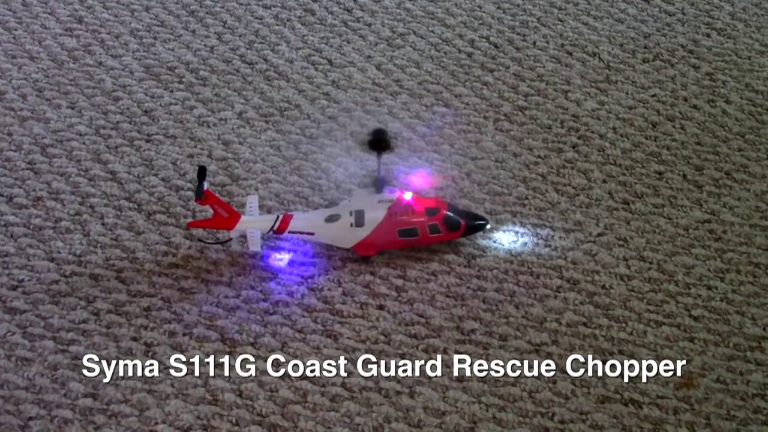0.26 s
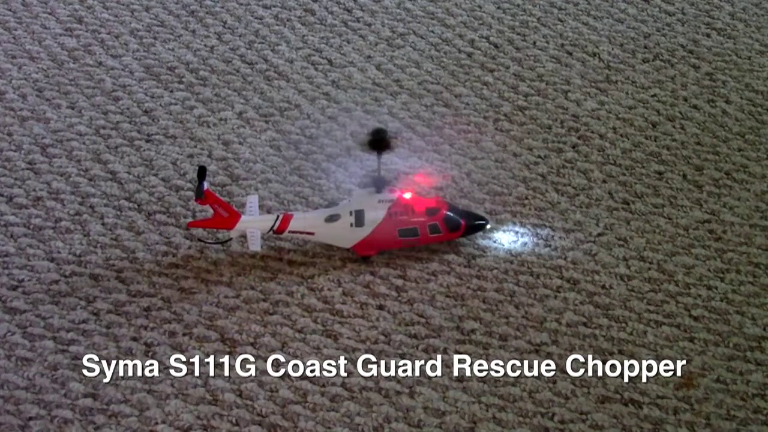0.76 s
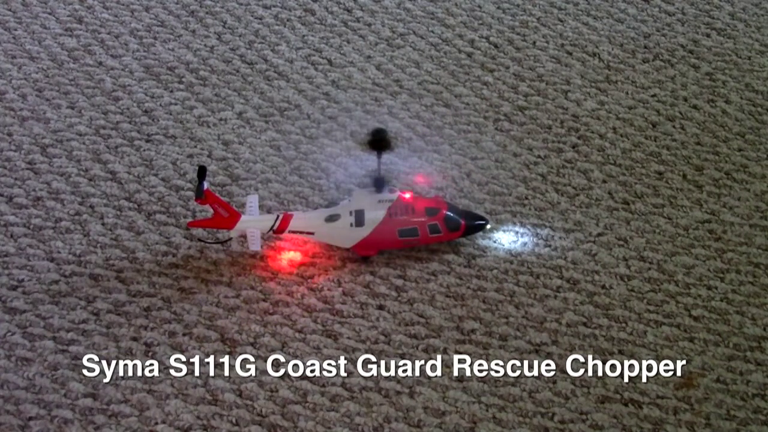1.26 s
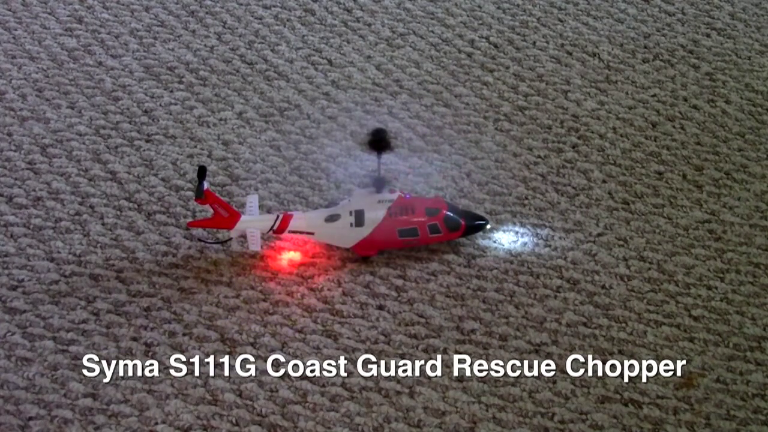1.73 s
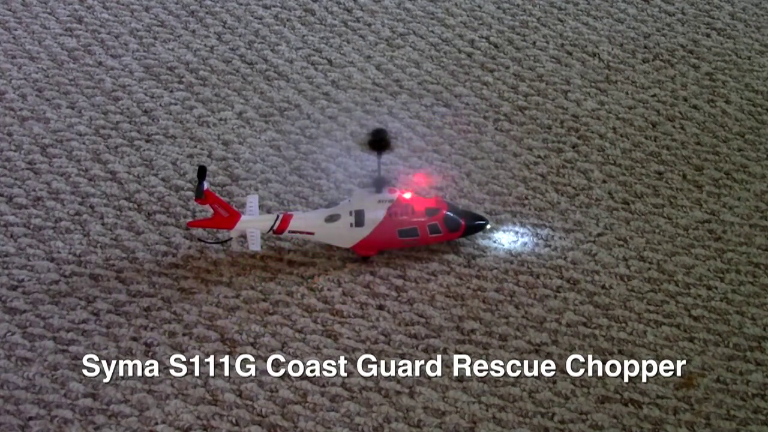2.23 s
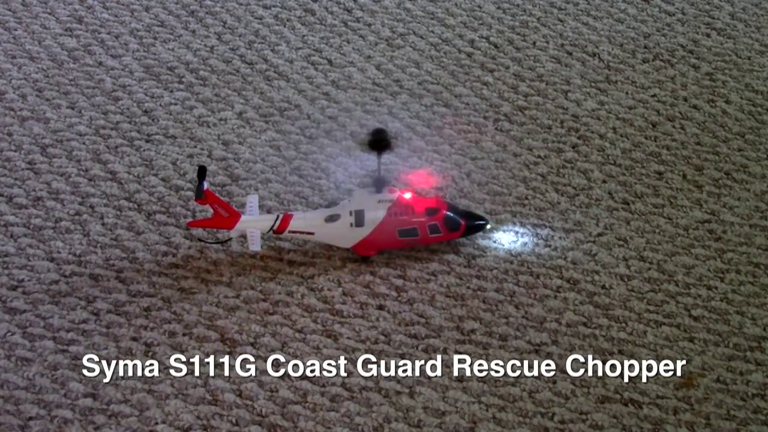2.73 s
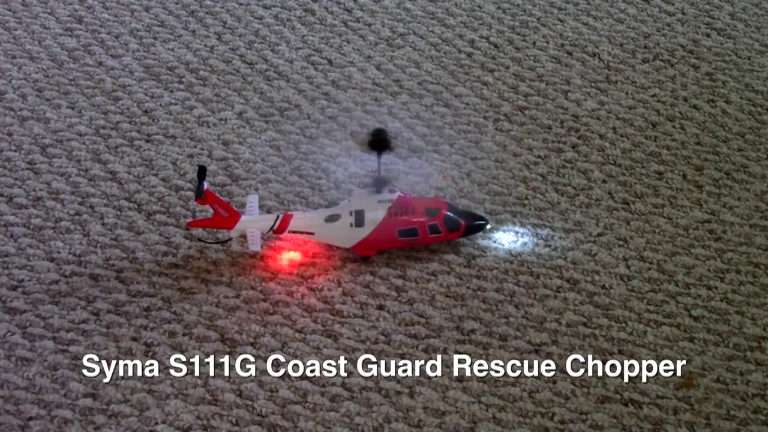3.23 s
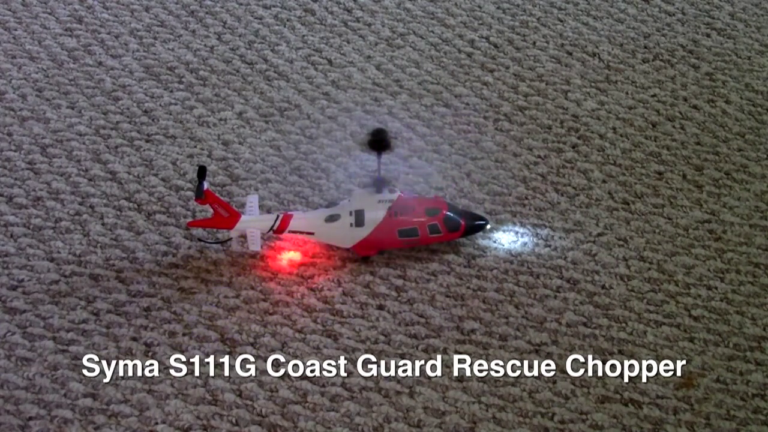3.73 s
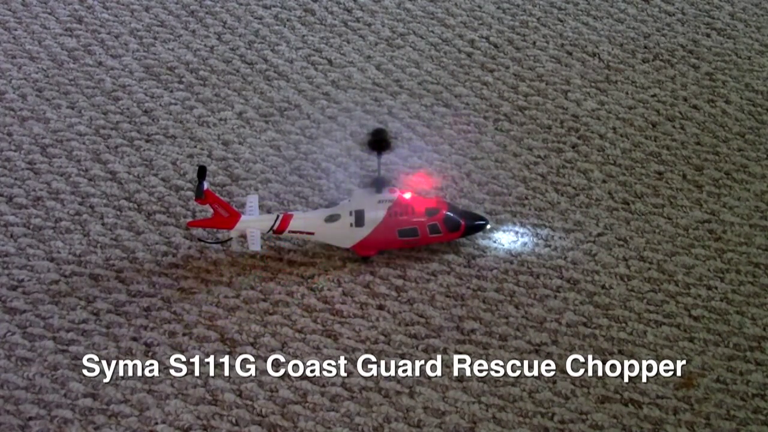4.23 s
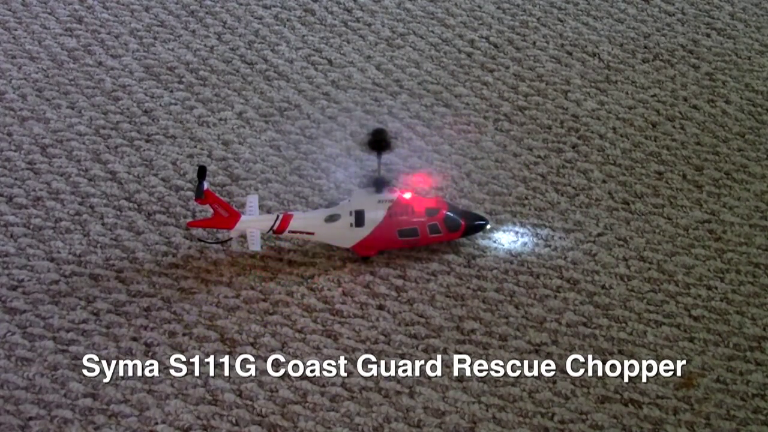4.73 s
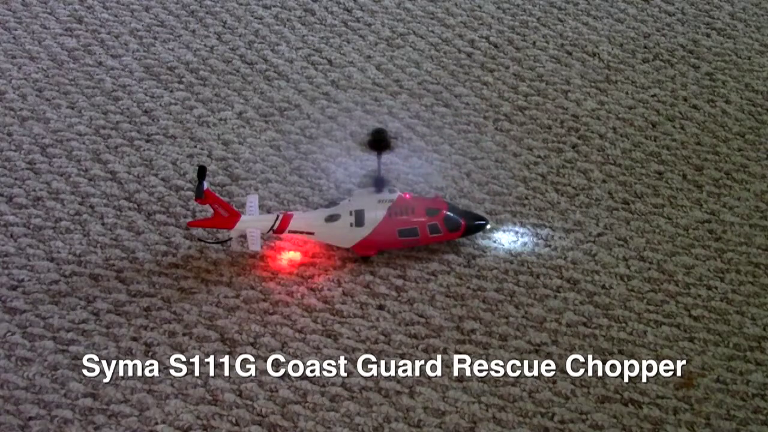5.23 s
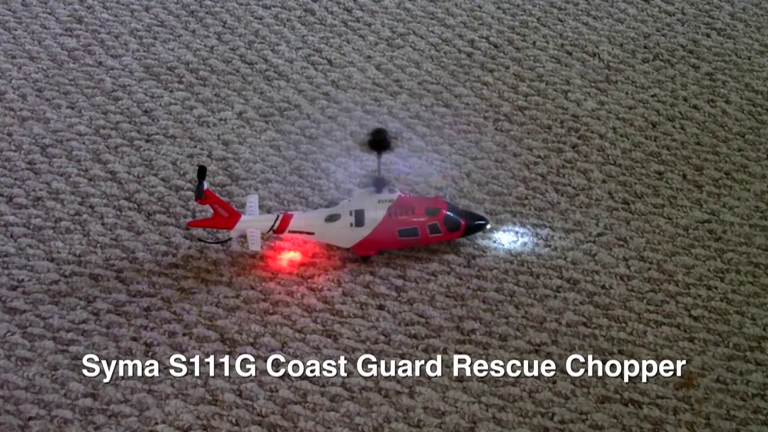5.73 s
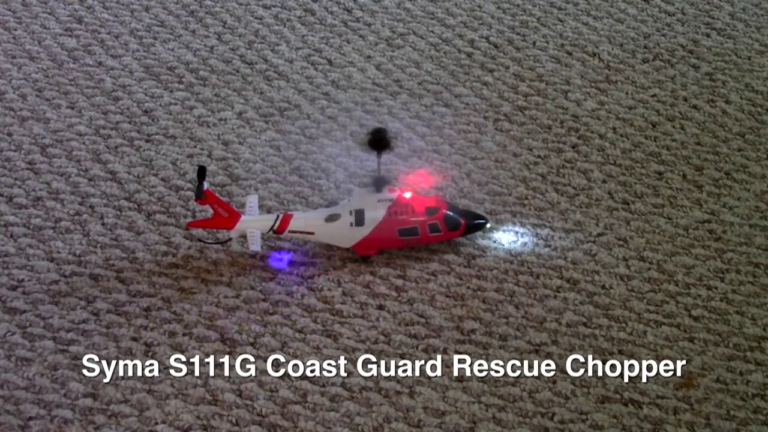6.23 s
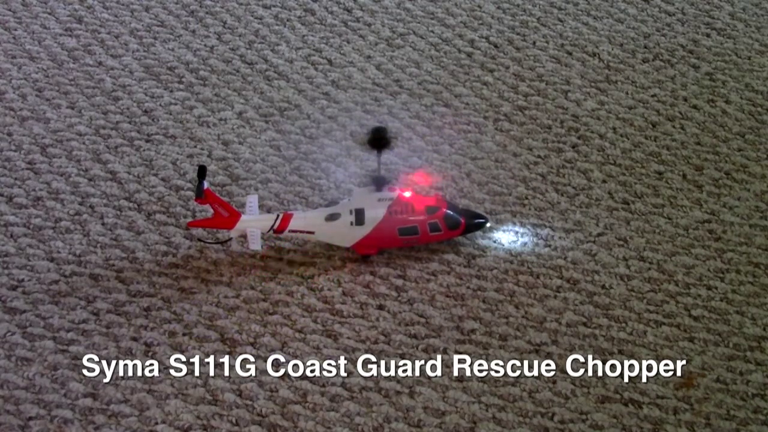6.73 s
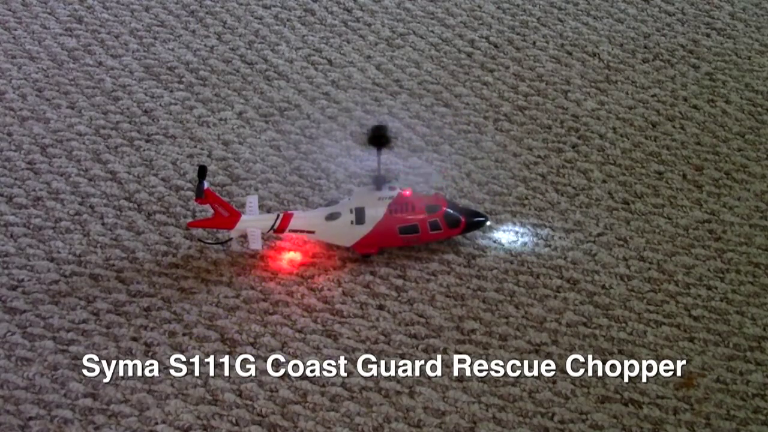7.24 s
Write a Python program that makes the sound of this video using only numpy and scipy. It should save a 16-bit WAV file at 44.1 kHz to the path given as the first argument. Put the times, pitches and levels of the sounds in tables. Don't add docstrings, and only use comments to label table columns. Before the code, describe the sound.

A small toy helicopter's electric motors spin up to a buzzing, rattling whir, idle unevenly on carpet, then rise in pitch to full speed.

```python
import sys
import numpy as np
from scipy import signal
from scipy.fft import rfft, irfft, next_fast_len
from scipy.io import wavfile

SR = 44100
rng = np.random.default_rng(int(sys.argv[2]) if len(sys.argv) > 2 else 0)


def inscribe(sig):
    pcm = np.round(np.clip(np.atleast_2d(sig).T, -1, 1) * 32767)
    wavfile.write(sys.argv[1], SR, pcm.astype(np.int16))


def decibels_to_gain(level_db):
    exponent = np.asarray(level_db, float) / 20
    return 10 ** exponent


N = 329982
STEP = 64
IDLE_HZ, FULL_HZ = 325, 420


def rms_one(x):
    return x / np.sqrt(np.mean(x ** 2) + 1e-20)


def in_time(rows):
    t, *columns = np.transpose(rows)
    return [np.interp(np.arange(N) / SR, t, c) for c in columns]


def control_s():
    return np.arange(0, N, STEP) / SR


def smooth(steps):
    return np.interp(np.arange(N) / STEP, np.arange(len(steps)), steps)


def coloured(x, spectrum):
    hz, db = np.transpose(spectrum)
    size = next_fast_len(N, True)
    bins_hz = np.maximum(np.fft.rfftfreq(size, 1 / SR), 1)
    gain = decibels_to_gain(np.interp(np.log(bins_hz), np.log(hz), db))
    return irfft(rfft(x, size) * gain, size)[:N]


def noise(spectrum):
    return rms_one(coloured(rng.standard_normal(N), spectrum))


def drift(rate_hz):
    r = np.exp(-2 * np.pi * STEP * rate_hz / SR)
    white = rng.standard_normal(N // STEP + 2001)
    slow = signal.lfilter([1], [1, -2 * r, r * r], white)[2000:]
    return rms_one(slow - slow.mean())


def tone(turns, db, wobble_db, rate_hz, slip_rad):
    phase = 2 * np.pi * ((turns + rng.random()) % 1) + smooth(slip_rad * drift(rate_hz))
    level = smooth(np.sqrt(2) * decibels_to_gain(db + wobble_db * drift(rate_hz)))
    return level * np.sin(phase.astype(np.float32))


# t/s, front f/Hz, rear f/Hz
SHAFT_SPEED = [(0, 150, 170), (.3, 215, 255), (.5, 258, 290), (.7, 291, 315), (.9, 316, 318),
               (1.1, 324.7, 324.8), (1.4, 328.8, 316), (2.4, 332.7, 314.5), (2.8, 331, 313),
               (3.4, 325.7, 312), (4.15, 325.2, 309.5), (4.7, 327, 299.6), (5.05, 327, 311),
               (5.4, 346, 332), (6.15, 399, 392), (6.7, 418, 402.5), (7.05, 427, 416), (7.48, 449, 443)]


def shaft_speeds():
    return in_time(SHAFT_SPEED)


# order/shaft turns, idle level/dB, full level/dB; 7 = pinion teeth, 2.13 = second stage
FRONT_ORDERS = [(.62, -74, -56), (1, -66, -56), (2, -62, -55), (2.13, -63, -49), (2.43, -72, -57),
                (3, -55, -57), (4, -62, -49), (4.26, -66, -58), (5, -56, -53), (5.7, -57, -59),
                (6, -49.5, -51), (6.39, -51, -43), (6.7, -52, -49), (7, -41.5, -45), (7.3, -52, -54),
                (8, -46, -56), (8.52, -48, -56), (14, -58, -50)]
REAR_ORDERS = [(1, -61, -50), (1.3, -72, -63), (2, -66, -50), (2.13, -65, -53), (2.3, -72, -56),
               (3, -63, -51), (4, -61, -44.5), (5, -46.5, -56), (6, -58, -51), (6.7, -55, -48),
               (7, -51, -39), (7.3, -54, -49), (8, -54, -56), (14, -58, -42.5)]


def gear_tones(shaft_hz, orders):
    turns = np.cumsum(shaft_hz) / SR
    fast = (shaft_hz[::STEP] - IDLE_HZ) / (FULL_HZ - IDLE_HZ)
    load = np.clip(fast / .7, 0, 1)
    speed_db = 1.5 + 24 * np.minimum(fast + .15, 0) + 5 * (np.maximum(fast, .7) - .7)
    out = 0
    for order, idle_db, full_db in orders:
        db = idle_db + load * (full_db - 0.5 - idle_db) + speed_db
        out = out + tone(order * turns, db, wobble_db=1.5, rate_hz=7.0, slip_rad=.28)
    return out


def howl_load_db(front_hz, rear_hz):
    apart_hz = np.clip(np.abs(front_hz - rear_hz) - 20, 0, 10)
    fast = (rear_hz - FULL_HZ) / (FULL_HZ - IDLE_HZ)
    return -39 + 0.6544 * apart_hz - 1.5 + 11.1 * fast


def mesh_howl(shaft_hz, level_db):
    mesh_rad = 2 * np.pi * 7 * np.cumsum(shaft_hz) / SR
    out = 0
    for k, width_hz, db in [(1, 68.0, -0.82), (2, 165.0, -1.7)]:
        rough = signal.lfilter(*signal.butter(2, width_hz, fs=SR), rng.standard_normal((2, N)))
        band = rough[0] * np.cos(k * mesh_rad) + rough[1] * np.sin(k * mesh_rad)
        out = out + decibels_to_gain(db) * rms_one(band)
    return decibels_to_gain(level_db) * out


def chirp(shaft_hz, order, peak_s, peak_db, half_s):
    off_peak = (control_s() - peak_s) / half_s
    level_db = peak_db - 20 * np.minimum(off_peak ** 2, 10)
    turns = order * np.cumsum(shaft_hz) / SR
    return tone(turns, level_db, wobble_db=3.0, rate_hz=60.0, slip_rad=1.5)


# t/s, level/dB
EFFORT = [
    (0, -41.5),
    (.2, -34),
    (.64, -28),
    (.92, -28.5),
    (4.2, -25.5),
    (4.5, -26.5),
    (6.2, -25),
    (7.48, -23.5),
]


def rattle_effort_db():
    return in_time(EFFORT)[0]


def rattle(shaft_hz, motor_db, gear_db, rotor_db):
    motor_rad = 2 * np.pi * np.cumsum(shaft_hz) / SR
    gear_rad = 7 / 23 * motor_rad
    rotor_rad = 7 / 27 * gear_rad
    swell_db = motor_db * np.cos(motor_rad)
    swell_db += gear_db * (np.cos(gear_rad) + 0.88 * np.cos(2 * gear_rad + 1))
    swell_db += rotor_db * (np.cos(rotor_rad) + 0.8 * np.cos(2 * rotor_rad + 2))
    swell_db += 0.42 * smooth(drift(19.0))
    return rms_one(rng.standard_normal(N) * decibels_to_gain(swell_db))


# f/Hz, width/Hz, level/dB
SHELL_MODES = [(905, 190, -13.5), (1589, 253, -7), (2227, 510, -4.5), (2822, 584, -2.5), (3798, 480, 0.5),
               (4480, 880, -10), (4980, 910, -6), (5830, 640, -5), (6356, 594, 0), (8304, 1160, -7),
               (10430, 1240, -9.5), (12460, 660, -29), (14800, 970, -18)]


def shell(x):
    out = 0
    for i, (hz, width_hz, db) in enumerate(SHELL_MODES):
        r = np.exp(-np.pi * width_hz * 1.5 / SR)
        b = (1 - r * r) / 2 * np.array([1, 0, -1])
        a = [1, -2 * r * np.cos(2 * np.pi * hz / SR), r * r]
        rung = signal.lfilter(b, a, signal.lfilter(b, a, x))
        out = out + (-1) ** i * decibels_to_gain(db) * rung
    return out


def slow_start(x, shaft_hz, dull_db, bright_db):
    treble = signal.sosfiltfilt(signal.butter(2, 7200, "high", fs=SR, output="sos"), x)
    speed = shaft_hz / IDLE_HZ
    kept = decibels_to_gain(dull_db * np.clip(speed - .85, -1, 0) + bright_db * np.maximum(speed - 1, 0))
    return x - (1 - kept) * treble


def rattling_body(front_hz, rear_hz, effort_db):
    teeth = rattle(front_hz, motor_db=0.7, gear_db=1.5, rotor_db=1.0)
    teeth += decibels_to_gain(-2.0) * rattle(rear_hz, motor_db=0.9, gear_db=-0.5, rotor_db=1.13)
    rung = rms_one(shell(teeth))
    return decibels_to_gain(effort_db - 0.54) * slow_start(rung, rear_hz, dull_db=9.0, bright_db=5.0)


THROTTLE_S = .25, .7, 5.4, 5.8
# multiple, start level/dB, idle level/dB, full level/dB
WHINE_LINES = [(2, -53, -48, -52), (3, -44, -54, -56), (6, -65, -62, -58), (7, -56, -58, -57),
               (8, -50, -51, -53), (9, -50, -51, -56), (10, -48, -45, -52), (11, -45, -49, -51),
               (12, -51, -61, -62), (13, -53, -60, -70), (14, -62, -65, -68), (15, -64, -60, -71),
               (16, -72, -70, -77), (17, -67, -66, -71), (18, -64, -63, -74), (19, -68, -70, -75)]


def whine():
    turns = 816.5 * np.arange(N) / SR
    out = 0
    for k, start_db, idle_db, full_db in WHINE_LINES:
        db = np.interp(control_s(), THROTTLE_S, [start_db, idle_db, idle_db, full_db])
        out = out + tone(k * turns, db, wobble_db=2.8, rate_hz=14.0, slip_rad=.3)
    return out


# f/Hz, density/dB per Hz
BLADE_HISS = [(150, -9), (250, -8), (500, -5), (800, 0.5), (1100, -4), (1400, -3), (3000, -8), (6000, -15)]


def blades(effort_db):
    hiss_db = -43 + 1.72 * (effort_db + 26)
    return decibels_to_gain(hiss_db + 1.5) * noise(BLADE_HISS)


def room(x):
    t = np.arange(SR // 8) / SR
    tail = rng.standard_normal(len(t)) * decibels_to_gain(-60 * t / .15) * (t > .004)
    echoes = decibels_to_gain(-10) * tail / np.sqrt(np.sum(tail ** 2))
    echoes[0] = 1
    return signal.fftconvolve(x, echoes / np.sqrt(np.sum(echoes ** 2)))[:N]


# f/Hz, side minus mid level/dB
WALL_SIDE = [(1500, -46), (2800, -30.5), (3700, -37.5), (5300, -11), (6500, -26.5), (8000, -29),
             (9100, -25), (10500, -22.5), (12800, -1.5), (15000, -20)]


def off_wall(body):
    return coloured(np.roll(body, round(.021 * SR)), WALL_SIDE)


# multiple, level/dB
FAN_LINES = [(3, -62), (4, -63.5), (6, -62), (10, -64), (12, -70.5)]
# mid t/s, length/s, multiple, top level/dB
FAN_SWELLS = [(1.5, 2.4, 5, -51), (3.85, 1.6, 5, -50), (6.3, 2.9, 5, -53.5), (.4, .6, 8, -55),
              (1.05, .6, 8, -58), (1.8, .8, 8, -56), (2.55, .8, 8, -47.5), (3.2, .8, 8, -45.5),
              (3.9, .7, 8, -48.5), (5.05, .65, 8, -46.5), (6.05, 1.4, 8, -49), (7.05, .9, 8, -51),
              (1.85, 1.1, 9, -58), (3.2, 1.2, 9, -52), (4.7, 1.4, 9, -53), (5.7, .4, 9, -52),
              (6.5, 1.3, 9, -54.5)]


def fan(fade):
    turns = 19.75 * np.arange(N) / SR
    out = 0
    for k, db in FAN_LINES:
        out = out + fade * tone(k * turns, db, wobble_db=3.0, rate_hz=1.7, slip_rad=0.91)
    for line in (5, 8, 9):
        arches = []
        for mid_s, length_s, k, db in FAN_SWELLS:
            if k == line:
                off_mid = np.clip((control_s() - mid_s) / length_s, -.5, .5)
                arches.append(decibels_to_gain(db) * np.cos(np.pi * off_mid).clip(0))
        level_db = 20 * np.log10(np.max(arches, axis=0) + decibels_to_gain(-63.5))
        out = out + tone(line * turns, level_db - 2.8, wobble_db=2.0, rate_hz=2.7, slip_rad=.5)
    return out


# f/Hz, density/dB per Hz
RUMBLE_SPECTRUM = [(12, -39), (20, -1.5), (80, 0), (166, -2.5), (248, -13), (329, -2.5), (500, -6), (650, -59),
                   (1100, -120)]


def low_rumble(fade):
    return fade * decibels_to_gain(-52.0) * noise(RUMBLE_SPECTRUM)


# f/Hz, density/dB per Hz
PORT_SPECTRUM = [(18, -35), (30, -9), (76, -2), (213, -1), (824, -10), (1170, -17), (1400, -25),
                 (1820, -54), (3080, -120)]


def port_noise(fade):
    return fade * decibels_to_gain(-51.5) * noise(PORT_SPECTRUM)


# t/s, level/dB
FADE_IN = [
    (0, -4.5),
    (.3, -5),
    (.6, -4.5),
    (.75, -3),
]


def fade_in():
    return decibels_to_gain(in_time(FADE_IN)[0])


def scene():
    front_hz, rear_hz = shaft_speeds()
    effort_db, fade = rattle_effort_db(), fade_in()
    load_db = howl_load_db(front_hz, rear_hz)
    body = rattling_body(front_hz, rear_hz, effort_db)

    mid = fade * (gear_tones(front_hz, FRONT_ORDERS) + gear_tones(rear_hz, REAR_ORDERS))
    mid += mesh_howl(front_hz, load_db + 2.0) + mesh_howl(rear_hz, load_db + 3.5)
    mid += chirp(front_hz, order=28, peak_s=.65, peak_db=-41, half_s=.12)
    mid += chirp(rear_hz, order=10, peak_s=.28, peak_db=-43, half_s=.1)
    mid += chirp(rear_hz, order=21, peak_s=5.95, peak_db=-44, half_s=.5)
    mid += room(body) + whine() + blades(effort_db)
    mid += fan(fade) + low_rumble(fade)

    side = off_wall(body) + port_noise(fade)
    side -= coloured(mid, [(60, -30), (150, -20), (400, -20), (1000, -41), (4000, -40), (12000, -30)])
    return np.array([mid + side, mid - side])


def top_cut(x):
    return signal.sosfilt(signal.butter(12, 16950, fs=SR, output="sos"), x)


def record(dry):
    low_pass = signal.ellip(12, .5, 70, 15900, fs=SR, output="sos")
    mix = signal.sosfilt(low_pass, dry)
    return top_cut(mix)


dry = scene()
out = record(dry)
inscribe(out)
```